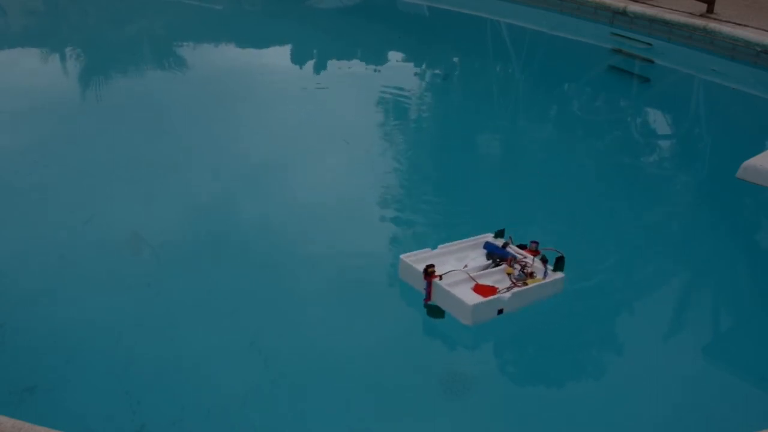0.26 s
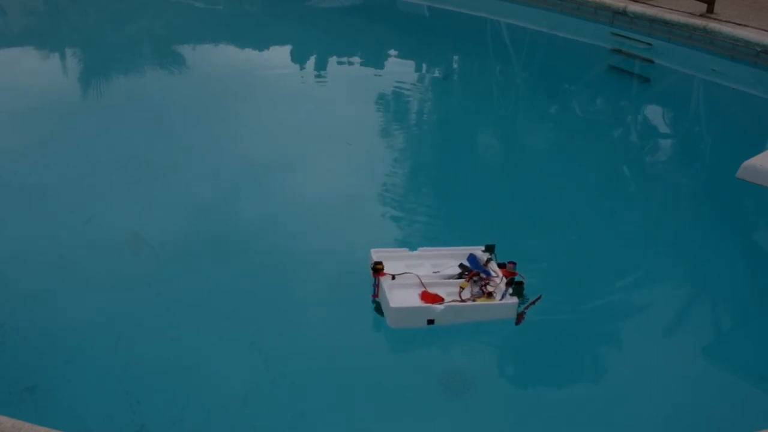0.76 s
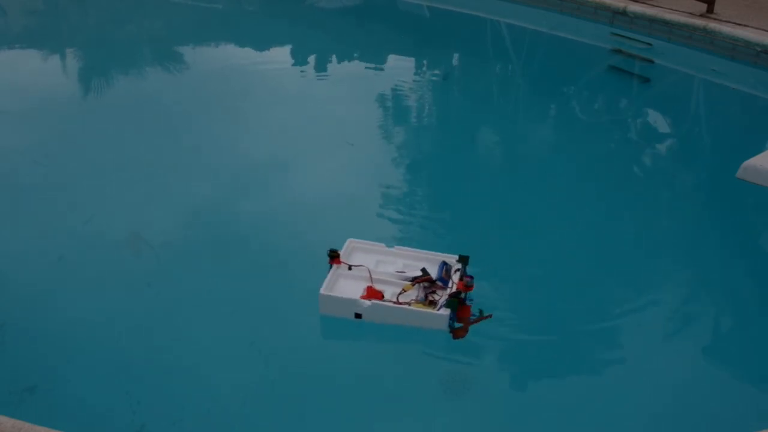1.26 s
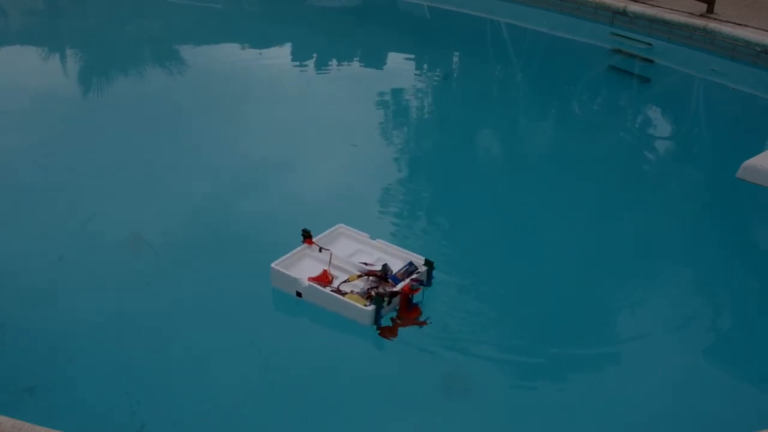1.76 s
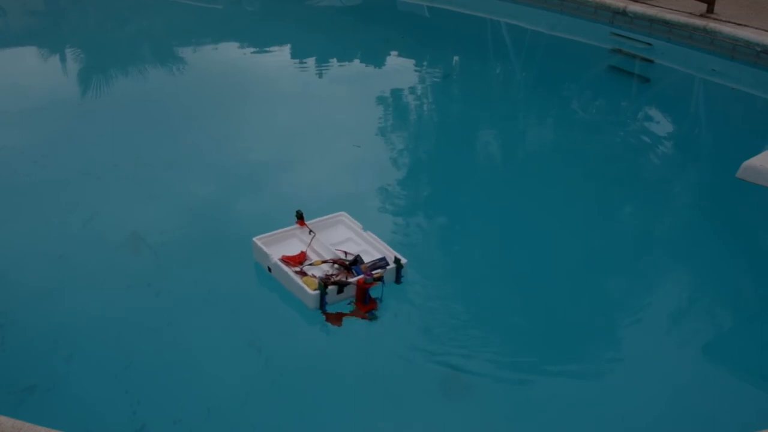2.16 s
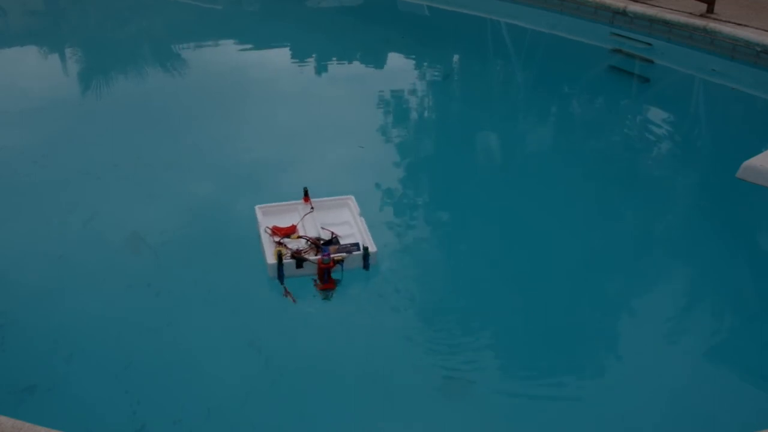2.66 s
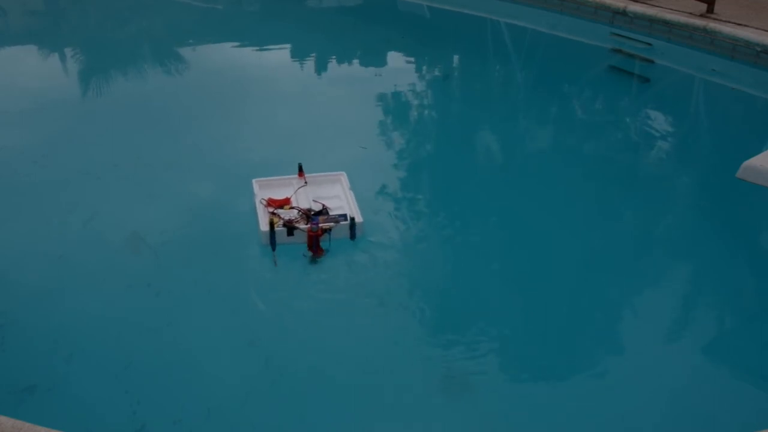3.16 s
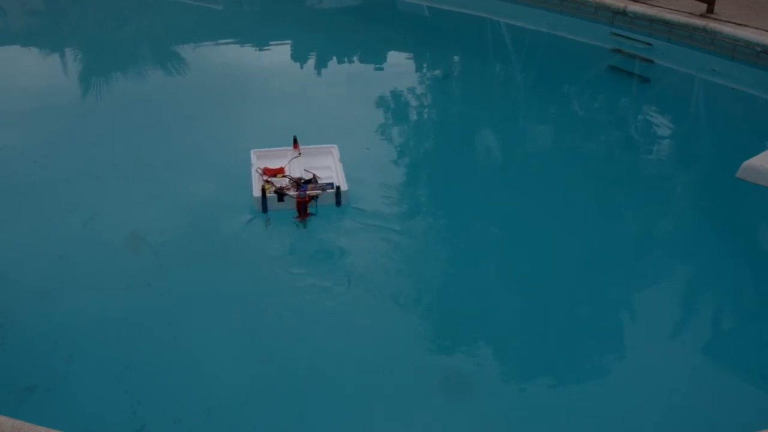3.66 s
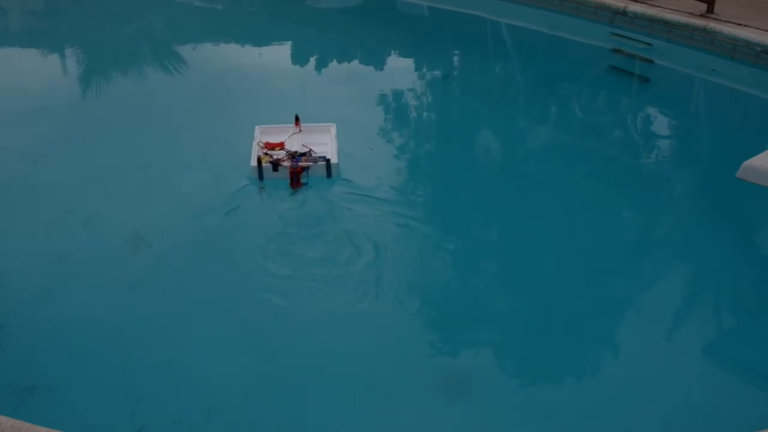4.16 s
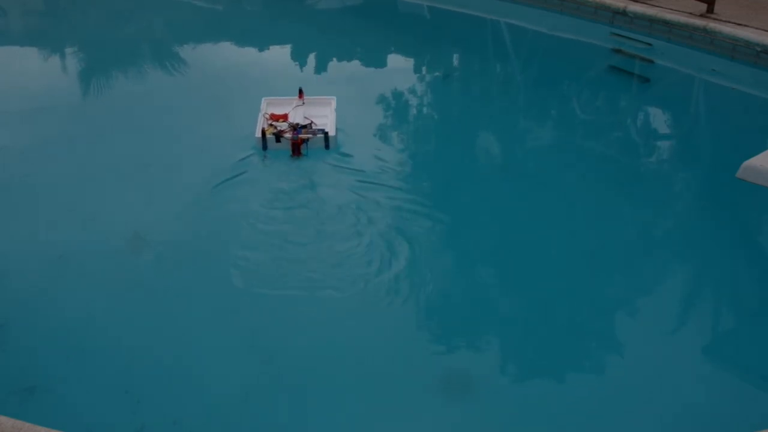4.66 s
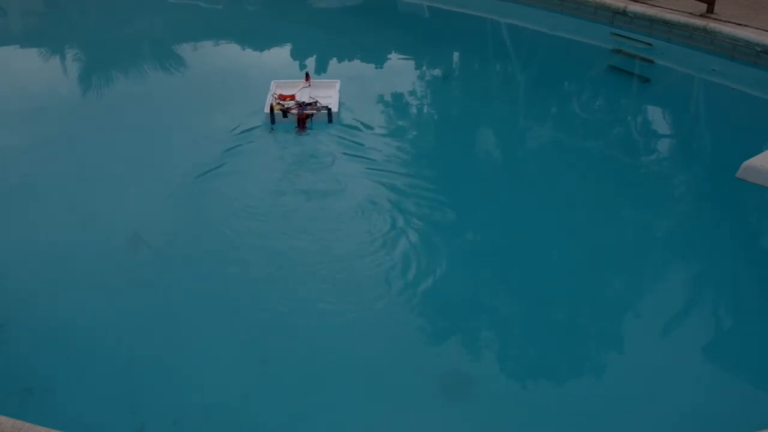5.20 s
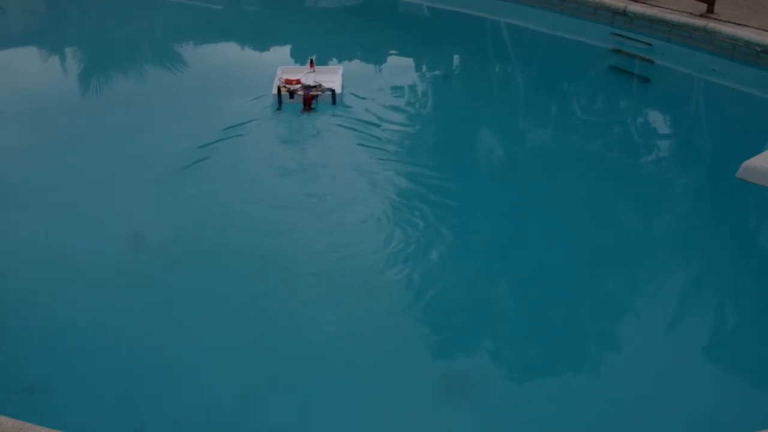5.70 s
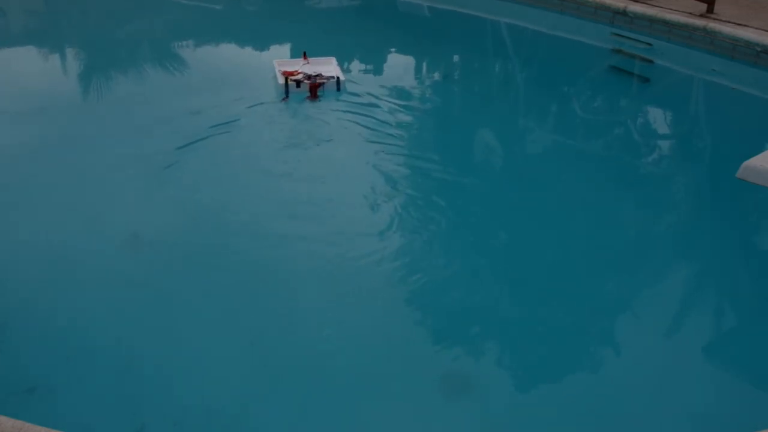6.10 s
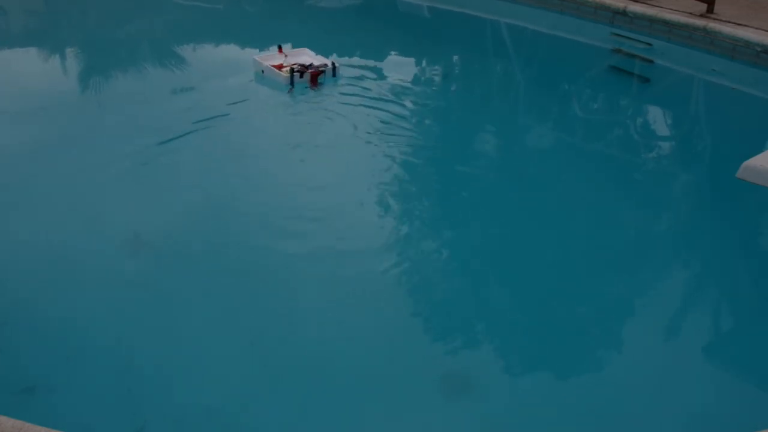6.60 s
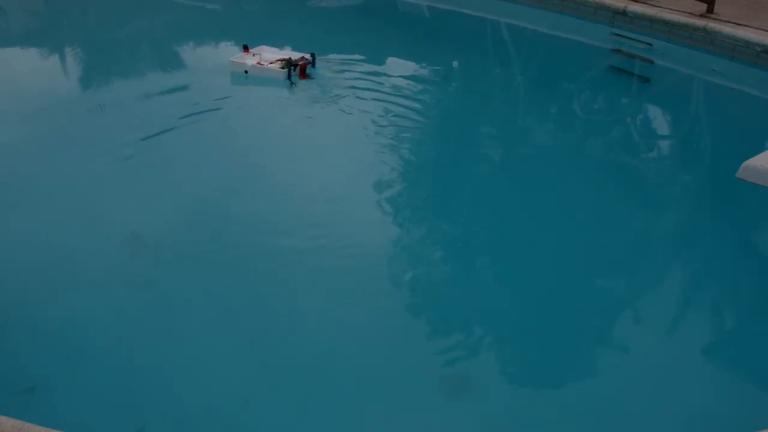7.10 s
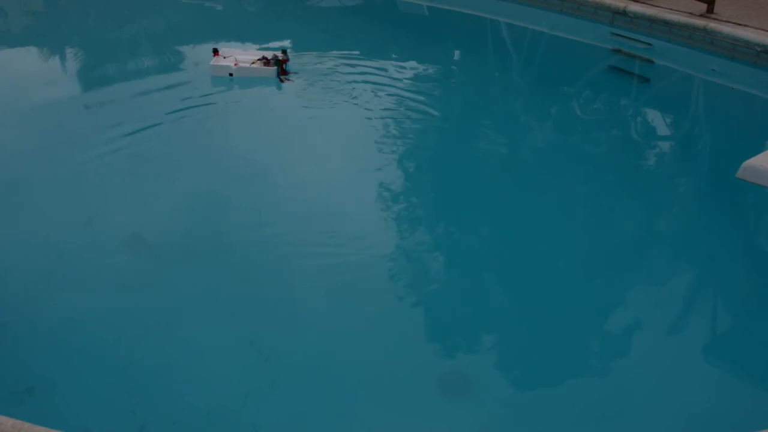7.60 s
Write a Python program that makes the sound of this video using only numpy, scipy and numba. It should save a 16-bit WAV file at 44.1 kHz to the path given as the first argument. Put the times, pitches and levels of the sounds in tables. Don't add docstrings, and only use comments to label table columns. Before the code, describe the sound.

A small geared electric motor buzzes and clatters in a foam model boat, its whine climbing to full throttle then easing back, under a thin high whistle.

```python
import sys
import numpy as np
from scipy import signal
from scipy.fft import rfft, irfft
from scipy.io import wavfile
from scipy.ndimage import uniform_filter1d
from numba import njit

SR = 44100
rng = np.random.default_rng(int(sys.argv[2]) if len(sys.argv) > 2 else 0)


def persist_wave(psi):
    counts = np.round(np.clip(psi, -1, 1) * 32767).astype(np.int16)
    wavfile.write(sys.argv[1], SR, np.atleast_2d(counts).T)


def ratio_of_db(decibels):
    return 10 ** (np.asarray(decibels, float) / 20)


N = 346180
T_S = np.arange(N) / SR
TEETH = 12
CRUISE_HZ = 240
FULL_LOAD_HZ = 385


def unit(x):
    return x / np.sqrt(np.mean(x ** 2))


def steady(value):
    return np.full(N, float(value))


def curves(table):
    s, *columns = np.transpose(table)
    return [np.interp(T_S, s, c) for c in columns]


def bumps(rows):
    return sum(height * np.exp(-((T_S - s) / length_s) ** 2) for s, length_s, height in rows)


def shape(x, hz, gain):
    f = np.maximum(np.fft.rfftfreq(N, 1 / SR), 1)
    return irfft(rfft(x) * np.interp(np.log(f), np.log(hz), gain), N)


def colour(x, points):
    f = np.maximum(np.fft.rfftfreq(N, 1 / SR), 1)
    hz, db = np.transpose(points)
    return irfft(rfft(x) * ratio_of_db(np.interp(np.log(f), np.log(hz), db)), N)


def walk(rate_hz):
    k = int(SR / rate_hz)
    held = np.repeat(rng.standard_normal(N // 200), k)[:N]
    return unit(uniform_filter1d(uniform_filter1d(held, k), k))


@njit
def ring(x, hz, width):
    y, band, low = np.empty(len(x)), 0., 0.
    for i in range(len(x)):
        g, k = np.tan(np.pi * hz[i] / SR), width / hz[i]
        v = (band + g * (x[i] - low)) / (1 + g * (g + k))
        band, low, y[i] = 2 * v - band, low + 2 * g * v, k * v
    return y


def ring_twice(x, hz, width_hz):
    return ring(ring(x, hz, width_hz), hz, width_hz)


# f/Hz, level/dB per Hz
RUMBLE = [(12, -35), (20, -2), (43, -5), (161, -10), (220, -5), (290, -20), (480, -120)]
# f/Hz, level/dB
PUMP = [(119.5, -70)]


def garden():
    out = unit(colour(rng.standard_normal(N), RUMBLE)) * ratio_of_db(-61.5 + 1.7 * walk(4))
    for hz, db in PUMP:
        out = out + np.sqrt(2) * ratio_of_db(db + 2.5 * walk(5.5)) * np.sin(2 * np.pi * hz * T_S)
    return out


# t/s, loudness at the camera/dB, gear case turned to the camera/dB
BOAT = [(0, -39, 3.5), (.3, -38, 0), (1.1, -40, 1), (1.55, -40, 3), (2, -37, 1.5), (2.55, -37, -1),
        (3, -37, 1), (3.43, -35.5, 4), (3.76, -37, 3), (4.05, -35.5, -3.5), (4.35, -35, -3.5),
        (4.72, -35, 0), (5.1, -36, -2.5), (5.5, -38, -6.5), (6.3, -40.5, -4.5), (6.75, -39, -4),
        (7.45, -43.5, 7), (7.85, -41.5, 1)]


def boat_place():
    return curves(BOAT)


# start t/s, takes/s, to tooth rate f/Hz
THROTTLE = [(0, .3, 208), (.8, .6, 214), (1.7, .13, 229), (1.84, .38, 241), (2.28, .25, 238.5),
            (2.62, .22, 241.5), (2.86, .22, 298), (3.09, .09, 309), (3.18, .19, 385), (3.76, .15, 360),
            (3.91, .15, 313), (4.1, .32, 384), (4.43, .1, 421), (4.71, .1, 398), (4.93, .42, 298),
            (5.35, .1, 264), (5.64, .38, 239), (6.3, .95, 252.5), (7.4, .45, 246)]


def tooth_rate():
    inertia_s = .04
    points = [(0.012, 210.5)]
    for start_s, takes_s, hz in THROTTLE:
        points += [(start_s, points[-1][1]), (start_s + takes_s, hz)]
    return uniform_filter1d(curves(points)[0], size=int(inertia_s * SR))


# t/s, throb depth/0-1
BINDING = [(0, .3), (.95, .34), (1.8, .33), (2.7, .22), (3.2, .38), (3.75, .66), (4.12, .31), (5, .44),
           (5.4, .26), (5.9, .2), (6.1, .31), (6.8, .22), (7.25, .46), (7.55, .25), (7.85, .36)]


def binding():
    return curves(BINDING)[0]


CHOP = [(6, .1, .1), (9, .06, .45), (12, .85, .75), (18, .22, .06), (21, .08, .08), (24, .08, .25),
        (30, .06, .06), (36, .05, .05)]
# t/s, length/s, level/dB
FLASHES = [(.22, 0.12, 8.5), (.64, 0.061, 4.5), (.88, 0.26, 5), (1.45, 0.24, 6.5), (2.0, 0.15, 4.5),
           (2.35, 0.042, 6), (2.5, 0.086, 6.5), (2.75, 0.032, 5.5), (3.0, 0.61, 6.5), (3.5, 0.27, -2),
           (4.39, 0.019, 12), (4.79, 0.024, 6), (4.95, 0.17, -1), (5.47, 0.015, 4), (5.88, 0.13, 0.5),
           (6.23, 0.017, 5.5), (6.45, 0.13, 7), (6.7, 0.31, 3), (7.55, 0.19, 3.5), (7.85, 0.055, 0)]


def whistle(turn, tooth_hz):
    switch_hz, sag_hz_per_hz = 12419, .335
    level_db = -44.5 + bumps(FLASHES)
    chop_db = -51 + 18.5 * np.log2(tooth_hz / CRUISE_HZ)
    chop = np.clip(ratio_of_db(chop_db - level_db), .45, 1.6)
    load_hz = np.minimum(tooth_hz, 2 * FULL_LOAD_HZ - tooth_hz)
    pitch_hz = switch_hz - sag_hz_per_hz * load_hz + 6 * walk(25) + 3 * walk(2.5)
    phase = 2 * np.pi * np.cumsum(pitch_hz) / SR
    tone = np.sin(phase)
    for multiple, below, above in CHOP:
        shift = 2 * np.pi * multiple * turn + .3 * walk(30)
        sides = below * np.sin(phase - shift) + above * np.sin(phase + shift)
        tone = tone + chop / 2 * ratio_of_db(2 * walk(25)) * sides
    gain = ratio_of_db(level_db + 0.58 * walk(2.6) + 1.86 * walk(45))
    skirt_points = [(9500, -47), (11300, -26), (12300, -11.0), (13300, -28), (15700, -36)]
    skirt = unit(colour(rng.standard_normal(N), skirt_points))
    return gain * np.sqrt(2) * tone + uniform_filter1d(gain, size=9000) * ratio_of_db(-9.5) * skirt


# multiple of the shaft turn, start t/s, stop t/s, level/dB
GEAR_LINES = [(16, 0.37, 0.82, -49.5), (14, 1.97, 2.97, -56), (10, 3.17, 4.6, -56.5),
              (11, 3.05, 4.6, -51.5), (58, 0.45, 1.05, -44.5), (30, 3, 3.9, -44.5), (130.6, 3.2, 3.75, -45),
              (12, 3.9, 4.97, -52.5), (26, 4.9, 9.1, -54.5), (84, 6.6, 7.5, -45), (60, 6.3, 8, -49.5),
              (47, 1.68, 2.35, -43), (113.4, 1.64, 2.6, -46), (97.6, 4.3, 5, -45.5), (132, 4.2, 5.0, -57),
              (152.4, 4.3, 5.6, -49), (16, 2.07, 3.0, -58)]


def gear_lines(turn):
    out = 0
    for multiple, start_s, stop_s, db in GEAR_LINES:
        fade = np.clip(np.minimum(T_S - start_s, stop_s - T_S) / 0.23, 0, 1)
        wander = (.5 + 0.016 * multiple) * walk(40)
        tone = np.sin(2 * np.pi * round(multiple) * turn + wander)
        out = out + np.sqrt(2) * tone * fade * ratio_of_db(db + 2.3 * walk(13))
    return out


# f/Hz, width/Hz, level over the boat/dB
TICK = (9400, 950, -28.5)
# t/s, length/s, level/dB
LOOSE = [(3.6, 0.65, 16), (4.5, 0.37, 7.5), (5.0, 0.81, 19.5)]


def coupling(angle):
    sharpness, lag_rad = 12, 0.61
    hz, width_hz, db = TICK
    gate = np.exp(sharpness * (np.cos(angle - lag_rad) - 1)) * ratio_of_db(2 * walk(26))
    tick = unit(ring_twice(gate * rng.standard_normal(N), steady(hz), width_hz))
    upper = ring(gate * rng.standard_normal(N), steady(1.15 * hz), 700.)
    tick = tick + ratio_of_db(-8.0) * unit(ring(upper, steady(1.16 * hz), 700.))
    return tick * ratio_of_db(boat_place()[0] + db + bumps(LOOSE))


# f/Hz, t/s, length/s, level over the boat/dB
KNOCKS = [(1537, 0.37, 0.11, -3.5), (1230, 0.099, 0.31, -6.5), (1510, 1.08, 0.38, -3.5),
          (2260, 2.34, 0.52, -6.5), (6970, 2.35, 0.25, -11.5),  (1535, 4.9, .1, -9),
          (1520, 5.73, 0.37, -25), (2120, 6.7, 0.21, -20.5), (1514, 6.2, .15, -8), (1500, 7.7, 0.16, -3.5),
          (687, 0.045, 0.11, -4.5), (1000, 3.8, .06, -7), (720, 6.17, 0.26, -10), (685, 2.13, .2, -15),
          (1550, 2.45, 0.22, -8), (935, 1.8, 0.099, -11), (1880, 0.61, 0.31, -11), (6900, 4.65, 0.18, -9),
          (6160, 4.7, .12, -22), (697, 2.55, 0.13, -10), (422, 4.66, 0.22, -10), (1254, 6.87, 0.23, -10)]


def knocks(angle):
    sharpness, lag_rad, wander_rad = 3, 0.19, 1.25
    gate = unit(np.exp(sharpness * np.cos(angle - lag_rad)))
    out = 0
    for hz, s, length_s, db in KNOCKS:
        ringing = np.sqrt(2) * np.sin(2 * np.pi * hz * T_S + wander_rad * walk(45))
        out = out + ringing * ratio_of_db(db + 2.5 * walk(22.05)) * bumps([(s, length_s, 1)])
    return out * gate * ratio_of_db(boat_place()[0])


# f/Hz, width/Hz, t/s, length/s, level over the boat/dB
THUMPED = [(712, 50, 3.26, 0.12, 2), (754, 39, 3.497, .16, 6), (761, 34, 3.75, .16, 5.5),
           (720, 69, 4.4, .08, 0), (699, 48, 4.22, 0.08, 2.5), (745, 40, 4.38, 0.079, 0),
           (783, 55, 4.58, 0.12, 3), (798, 39, 4.8, 0.087, 4), (770, 53, 5.02, .12, 4),
           (696, 67, 5.2, .1, 1), (937, 70, 3.95, 0.14, -1.5), (980, 62, 4.28, 0.07, 0),
           (990, 40, 4.6, 0.1, -4), (956, 50, 3.8, 0.28, -12), (1107, 50, 3.75, 0.23, -0.5),
           (1020, 20, .75, .2, -10), (945, 25, 1.15, .25, -9), (770, 25, .85, .3, -16),
           (1477, 70, 3.5, .2, -7), (1940, 50, 3.47, .12, -5.5), (730, 25, 6.65, 0.31, -1.5),
           (753, 25, 7.2, .3, 1.5), (740, 30, 7.65, .25, -3), (1520, 35, 7.5, .15, -8),
           (1663, 40, 4.65, 0.13, -7), (4190, 200, 3.45, .2, -7), (1563, 41, 4.56, 0.13, -5),
           (1570, 52, 4.85, 0.12, -3), (1570, 44, 3.15, .08, -5), (970, 60, 5.74, .3, -8),
           (1744, 42, 6.95, 0.16, -8.5)]


def thumps(angle):
    lag_turns, scatter_db = -0.1002, 1
    count = np.floor(angle / (2 * np.pi) - lag_turns).astype(int)
    strength = ratio_of_db(scatter_db * rng.standard_normal(400))
    pulses = unit(np.diff(count, prepend=count[0]) * strength[count])
    out = np.zeros(N)
    for hz, width_hz, s, length_s, db in THUMPED:
        span = slice(max(int((s - 3 * length_s) * SR), 0), int((s + 3 * length_s) * SR))
        sung = unit(ring_twice(pulses[span], steady(hz)[span], 1.5 * width_hz))
        out[span] += sung * ratio_of_db(db) * np.exp(-((T_S[span] - s) / length_s) ** 2)
    return out * ratio_of_db(boat_place()[0])


def worn_teeth(turn):
    steps_per_turn = 1024
    rows = rng.standard_normal((400, steps_per_turn))
    rows = signal.lfilter([1], [1, -.82], rows, axis=0)[50:].ravel()
    return unit(np.interp(turn * steps_per_turn, np.arange(rows.size), rows))


# f/Hz, level/dB per Hz
HULL = [(88, -50), (150, -21), (283, -10), (365, -18), (479, -1.5), (575, -1.5), (755, 5), (1070, 4.5),
        (1840, 5), (3290, 1.5), (4900, -3.5), (5980, -8.5), (8140, -17), (10900, -24), (11500, -26.5),
        (15000, -35), (22000, -120)]
ZONES_HZ = [300, 800, 2000, 4500, 8500]
REPEAT = [.8, .65, .45, .15, .05]
TOOTH_GATE = [0.036, 0.025, 0.052, 0.23, 0.2]
THROB = [.6, .55, .68, .52, .25]
# ring width/Hz, gain
RINGS = [(72.4, 2.4), (127, 0.45), (380, 0.48), (686, 0.74), (623, 1.97)]
# level over the boat/dB, dB per octave of speed, share of the turning/0-1, going away/dB per s
PARTS = [
    (-11.5, 1, 0, -0.32),
    (-1.5, 4.5, 0.12, 0),
    (-1, 1, 0.14, 0),
    (-1, 3.5, 0.96, 0),
    (-2.5, 8.5, 0.09, 0),
]
# t/s, deck f/Hz, gear case f/Hz
ASPECT = [(0, 1610, 5200), (.3, 1540, 5240), (1.4, 1440, 4600), (1.9, 1900, 5600), (2.25, 2260, 5000),
          (2.65, 1810, 4370), (3.45, 1810, 4250), (4.35, 1980, 4060), (4.75, 1770, 4640), (6.4, 2170, 5060),
          (7.85, 1610, 4930)]
# t/s, f/Hz
CAN = [(0, 8300), (.6, 8050), (1.1, 8400), (1.5, 8550), (2.6, 8450), (3.4, 8660), (4.3, 8400), (5.3, 8400),
       (5.9, 8160), (7.85, 8600)]
# t/s, length/s, level/dB
JOLTS = [(2.755, 0.055, 4), (2.87, 0.012, 2)]
# t/s, water reflection dip f/Hz, dip depth/0-1, openness of the motor can
TURNING = [(0, 3420, 0.72, 0.3), (.8, 3460, 0.04, 0.76), (1.1, 3460, 0.44, 1.7), (1.7, 3600, 0.6, 1.4),
           (2.1, 3620, 0.77, 0.5), (2.4, 3250, 0.7, 1.2), (2.9, 3130, 0.76, 0.59), (3.3, 3260, 0.5, 0.36),
           (4.5, 2920, 0.1, 0.72), (5.3, 2900, 0.2, 0.19), (6.2, 3180, 0.07, 0.17),
           (7.85, 2680, 0.51, 0.16)]
# f/Hz, width/Hz, gain
DECK_RING = (938, 15, 0.54)
# f/Hz, width/Hz, depth/0-1, t/s, length/s
SHADOW = (7230, 760, 0.55, 1.54, 0.89)
# f/Hz, width/Hz, depth/0-1
CASE_DIP = (6000, 900, .5)


def clatter(turn, throb, speed):
    loud_db, facing_db = boat_place()
    dip_hz, dip, can_open = curves(TURNING)
    bottom_hz = 344 * (1 + 0.037 * walk(3.28))
    centres_hz = [bottom_hz, steady(755), *curves(ASPECT), *curves(CAN)]
    worn, fresh = worn_teeth(turn), rng.standard_normal(N)
    tooth = np.cos(2 * np.pi * TEETH * turn)
    out = 0
    for k, (db, rev_db, share, away_db) in enumerate(PARTS):
        level_db = loud_db + db + rev_db * speed + share * facing_db + away_db * T_S
        if k > 2:
            level_db = level_db + bumps(JOLTS)
        x = np.sqrt(REPEAT[k]) * worn + np.sqrt(1 - REPEAT[k]) * fresh
        x = x * (1 + TOOTH_GATE[k] * tooth) * np.exp(THROB[k] * throb)
        x = shape(colour(x, HULL), ZONES_HZ, np.eye(5)[k])
        width_hz, gain = RINGS[k]
        if k == 4:
            gain = gain * can_open * ratio_of_db(2.0 * walk(6))
        x = x + gain * ring(x, centres_hz[k], float(width_hz))
        out = out + unit(x) * ratio_of_db(level_db + 0.77 * walk(14))
    hz, width_hz, gain = DECK_RING
    out = out + gain * ring(out, steady(hz), float(width_hz))
    out = out - np.clip(dip, 0, 1) * ring(out, dip_hz, 1190.0)
    hz, width_hz, depth, s, length_s = SHADOW
    out = out - bumps([(s, length_s, depth)]) * ring(out, steady(hz), float(width_hz))
    hz, width_hz, depth = CASE_DIP
    return out - depth * ring(out, steady(hz), float(width_hz))


# tooth multiple, level over the boat/dB, dB per octave of speed, swell and bend by the wobble
TONES = [(2, -2.5, 2.3, 0.7, 1), (3, -0.5, 1.7, 0.63, 0.84), (4, -15, 4.6, 0.39, 0.95),
         (6, -7, 3.5, 0.36, 0.74)]
# tooth multiple, t/s, length/s, level/dB
TONE_SWELLS = [(3, 3.42, 0.27, 1.5), (3, 4.5, 0.063, -5), (3, 3.2, 0.12, 0), (3, 4.05, 0.052, 3),
               (3, 4.27, 0.14, -14), (3, 4.62, 0.14, 3.5), (3, 4.1, 0.066, 3), (3, 5.22, 0.054, 5.5),
               (6, 4.6, .15, -0.5), (6, 3.47, 0.25, -10), (6, 4.42, 0.04, -8), (2, 5.3, 0.21, -7),
               (2, 5.03, 0.12, -6), (3, 5.2, .15, 3), (3, 8.8, .12, 4), (3, 5.88, 0.1, -2.5), (2, 6.9, .25, -4),
               (4, 4.65, 0.17, -1), (2, 4.07, .14, -10), (6, 4.97, 0.057, -9), (6, 5.2, 0.14, 11),
               (6, 5.6, 0.21, -4), (4, 4.8, .1, -8), (4, 6.7, 0.091, -7), (2, 4.9, 0.1, -3), (2, 3.57, 0.27, -15),
               (2, 3.2, 0.15, -11), (3, 2.51, .35, 3), (4, 5.02, .06, -8), (2, 4.1, 0.089, -6),
               (2, 4.73, 0.28, -13), (3, 5.42, .07, -5), (3, 6.9, .5, 0), (3, 0.576, 0.018, -15),
               (3, 6.05, 0.1, 7.5), (3, 6.5, 0.2, 3.5)]
# t/s, level/dB
MESH = [(0, -11), (.25, -0.5), (.85, 0), (1.1, -5), (1.45, -7.5), (1.62, -1), (1.78, -13), (2.2, -2.5),
        (2.9, 1), (3.3, 8.5), (3.85, 5), (4.2, 6.5), (4.6, 2), (5.25, 2.5), (5.8, 0.5), (6.1, -4.5),
        (6.5, -3), (7.85, 0)]
# f/Hz, width/Hz, level/dB, change as the hull swings/dB, swing t/s
PANELS = [(487, 19.4, -2.5, -3.5, 3.1), (618, 34, 5, -31, 1.86), (725, 84, -5.5, 8.5, 1.8),
          (771.4, 78, -3, 4, 1.5), (957, 54, -8.5, 6, 3.4), (1254, 26, -5, -3.5, 3.9),
          (1542, 50, -1.5, 1.5, 3.8), (1710, 79, -26, -6, 5.3), (2030, 410, -19.5, 11.5, 4.8),
          (2320, 16, -4, 9.5, 3), (2478, 38, -9, 8, 2.8)]


def tooth_tones(turn, speed, throb_depth, angle, rattle):
    fast = np.maximum(speed, 0)
    tones = 0
    for multiple, db, rev_db, swell, bend in TONES:
        rough_rad = (.2 + .12 * multiple + .4 * (multiple > 4)) * (1 + .6 * fast) * walk(30)
        bend = bend * (1 + 2.5 * (multiple > 2) * fast) if multiple > 2 else bend
        phase = 2 * np.pi * TEETH * multiple * turn - bend * throb_depth * np.sin(angle) + rough_rad
        tone = np.sin(phase) * (1 + np.clip(swell * throb_depth, 0, 1.1) * np.cos(angle))
        for away in [-4, -3, -2, 2, 3, 4]:
            side_db = -15 + 3 * speed - 3 * (abs(away) - 1) + 3 * walk(6)
            tone = tone + ratio_of_db(side_db) * np.sin(phase + away * angle + 2.06 * walk(9))
        tone_swell_db = bumps([row[1:] for row in TONE_SWELLS if row[0] == multiple])
        level_db = db + tone_swell_db + rev_db * speed + 1.5 * walk(18) + .2 * multiple * walk(5)
        tones = tones + np.sqrt(2) * tone * ratio_of_db(level_db)
    tones = tones * ratio_of_db(boat_place()[0] + curves(MESH)[0]) + ratio_of_db(-7) * rattle
    swing_s = .2
    out = 0
    for k, (hz, width_hz, db, change_db, at_s) in enumerate(PANELS):
        turned = np.clip((T_S - at_s) / swing_s, 0, 1)
        mode = ring_twice(tones, steady(hz), 2.73 * width_hz)
        out = out + (-1) ** k * ratio_of_db(db + change_db * turned) * mode
    return out


def scene():
    tooth_hz, depth = tooth_rate(), binding()
    speed = np.log2(tooth_hz / CRUISE_HZ)
    turn = 1 + np.cumsum(tooth_hz) / SR / TEETH + .006 * walk(12)
    angle = 2 * np.pi * (turn + .46)
    throb = depth * (np.cos(angle) + .3 * np.cos(2 * angle + .8))
    throb = throb * 215 / tooth_hz
    rattle = clatter(turn, throb, speed)
    boat = rattle + tooth_tones(turn, speed, depth, angle, rattle)
    boat = boat + gear_lines(turn) * np.exp(0.33 * throb) + whistle(turn, tooth_hz)
    boat = boat + coupling(angle) + knocks(angle) + thumps(angle)
    wall = np.roll(boat, int(0.028 * SR))
    return (boat + ratio_of_db(-17) * wall + garden())[None]


def band_limit(x):
    return signal.sosfilt(signal.butter(12, 15750, fs=SR, output="sos"), x)


def record(dry):
    return band_limit(dry)


dry = scene()
out = record(dry)
persist_wave(out)
```